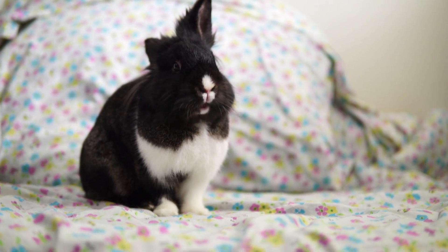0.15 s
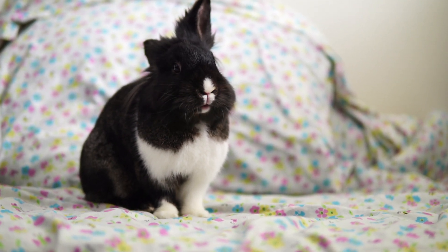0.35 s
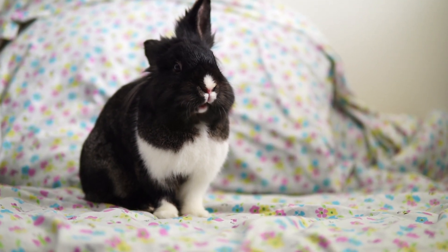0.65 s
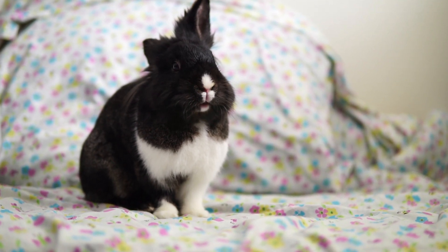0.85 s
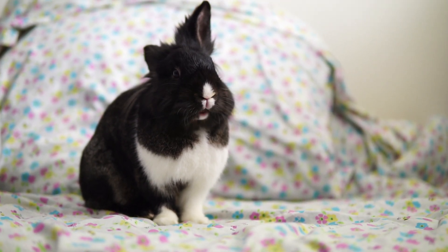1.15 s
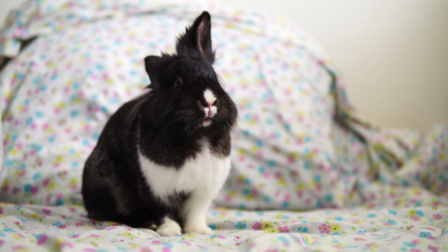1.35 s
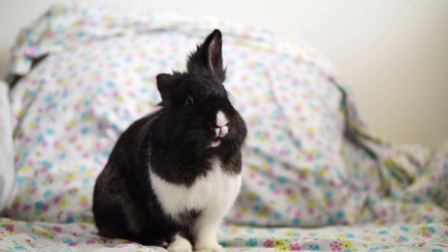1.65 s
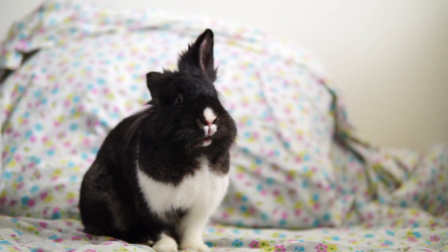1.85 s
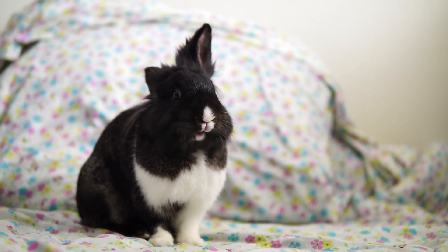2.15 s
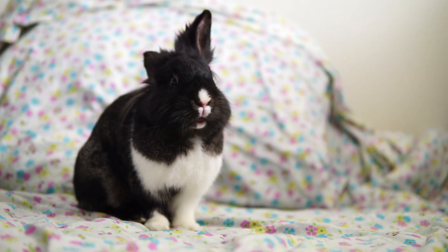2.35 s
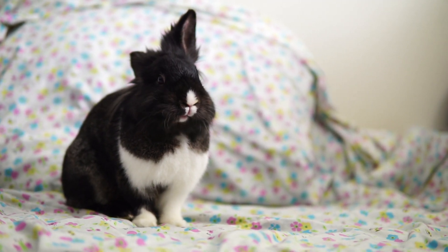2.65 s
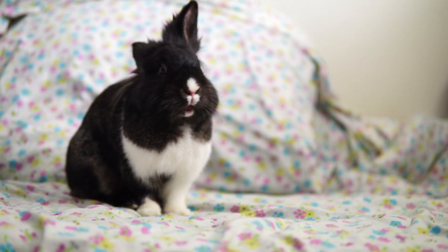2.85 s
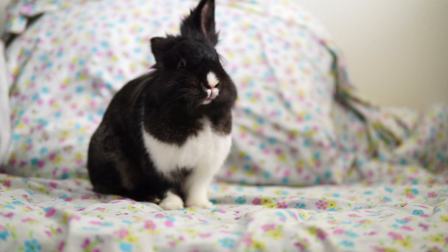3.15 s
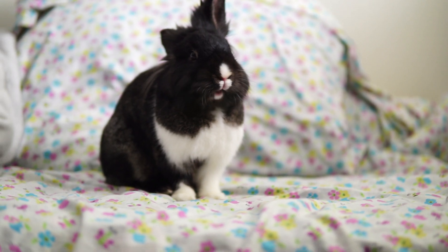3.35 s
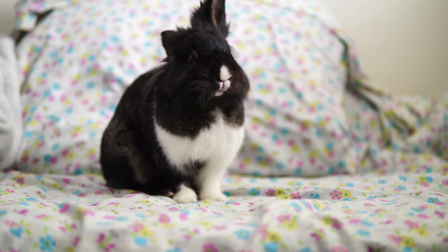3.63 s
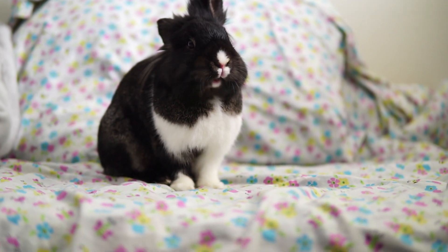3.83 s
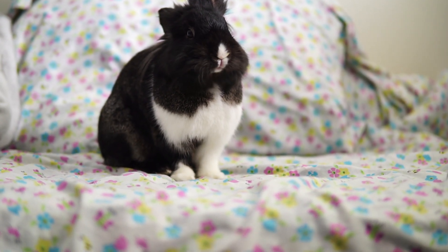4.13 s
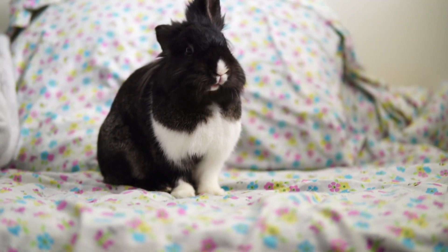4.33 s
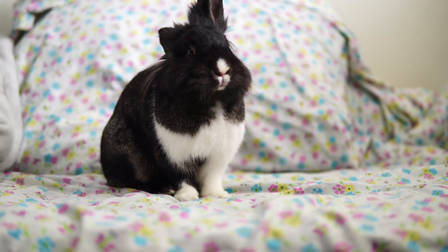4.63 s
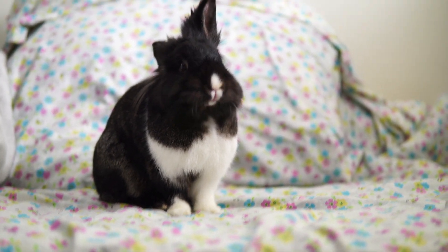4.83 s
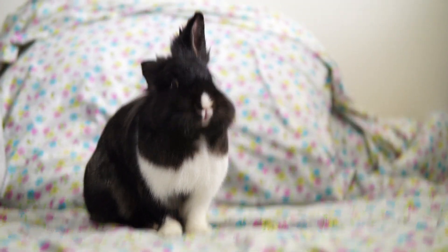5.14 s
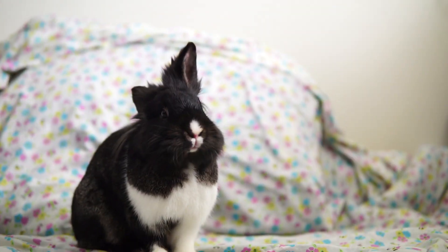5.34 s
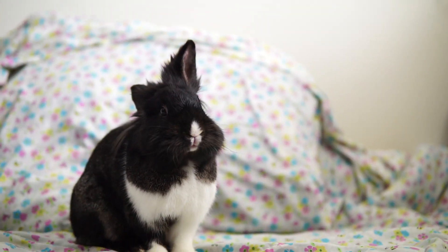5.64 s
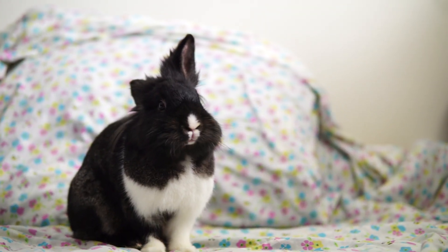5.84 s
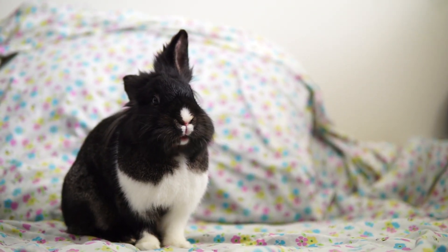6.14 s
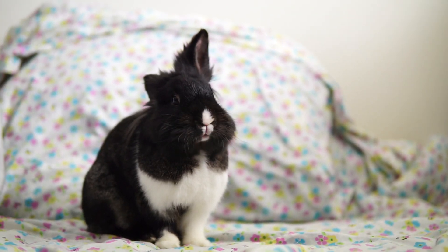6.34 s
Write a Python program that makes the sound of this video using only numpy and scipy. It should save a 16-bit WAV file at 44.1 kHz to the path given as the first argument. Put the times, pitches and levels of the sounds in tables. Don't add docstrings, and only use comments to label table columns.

```python
import sys
import numpy as np
from scipy import signal
from scipy.fft import rfft, irfft, next_fast_len
from scipy.io import wavfile
from scipy.ndimage import map_coordinates

SR = 44100
rng = np.random.default_rng(int(sys.argv[2]) if len(sys.argv) > 2 else 0)


def bounce(signal):
    frames = np.transpose(np.atleast_2d(signal))
    limited = np.clip(frames, -1, 1)
    pcm = np.round(limited * 32767).astype(np.int16)
    wavfile.write(sys.argv[1], SR, pcm)


def to_linear_factor(level_db):
    exponent = np.asarray(level_db, float) / 20
    return 10 ** exponent


N = 286006

# f/Hz, density/(dB per Hz)
FRICTION_COLOUR = [(59, -63), (100, -26), (210, -8), (328, -3.5), (570, -14), (691, -12), (1150, -8.5),
                   (2370, -3), (3190, -2.5), (6150, -15), (7450, -11), (10000, -13), (16000, -11)]


def unit(x):
    return x / np.sqrt(np.mean(x ** 2) + 1e-20)


def along(points, hz):
    f, v = np.transpose(points)
    return np.interp(np.log(hz + 1), np.log(f + 1), v)


def curves(rows):
    s, *cols = np.transpose(rows)
    return [np.interp(np.arange(N) / SR, s, c) for c in cols]


def wobble(rate_hz, size=N):
    knots = rng.standard_normal(int(size * rate_hz / SR) + 4)
    return map_coordinates(knots, [np.arange(size) * rate_hz / SR])


def filtered(x, response):
    m = next_fast_len(x.shape[-1] + 4096)
    spectrum = rfft(x, m) * response(np.fft.rfftfreq(m, 1 / SR))
    return irfft(spectrum, m)[..., :x.shape[-1]]


def modes(table):
    def response(f):
        total = 0
        for k, (c, w, db) in enumerate(table):
            total = total + (-1) ** k * to_linear_factor(db) * 1j * f * w / (c * c - f * f + 1j * f * w)
        return total
    return response


def ports(pair, alike):
    lead_s = 5 / 44100

    def angle(f):
        return np.arccos(np.clip(alike, 0, 1)) / 2 * f / (f + 150)

    mid, side = filtered(pair, lambda f: np.array([np.cos(angle(f)), np.sin(angle(f))]))
    stereo = np.array([mid + side, mid - side])
    return filtered(stereo, lambda f: np.exp(1j * np.pi * f * lead_s * np.array([[1], [-1]])))


def add(out, part, s):
    out[:, round(s * SR):][:, :part.shape[1]] += part


def hiss():
    # f/Hz, density/(dB per Hz)
    hiss_colour = [(18, -64), (30, -34.5), (150, -15), (309, -7), (480, -9), (1300, -3.5), (2900, -11.5),
                   (4600, -9.5), (7350, -13.5), (11000, -10.5), (13500, -11.5), (15800, -12.5)]
    level_db = -61.5
    a, b = filtered(rng.standard_normal((2, N)), lambda f: to_linear_factor(along(hiss_colour, f)))
    murmur = filtered(a - b, lambda f: 1 / (1 + (f / 500) ** 4))
    return to_linear_factor(level_db + 3.0) * unit(np.array([a, b + murmur]))


def drive():
    # t/s, tick level/dB, upper re lower part/dB
    effort = [(0, -73, -3), (.6, -69, -1), (1.15, -61, -5), (1.9, -66, -1), (2.35, -63, 4), (2.9, -65, -5),
              (3.15, -76, 0), (3.7, -66, -3), (4.1, -62, -3), (4.35, -68, -1), (4.7, -59, 4), (5, -61, 0),
              (5.4, -68, 0), (5.62, -61, -4), (5.88, -64, -4), (5.98, -73, -4), (6.2, -61, -5),
              (6.48, -61, -4)]
    # t/s, level/dB
    extra_knock = [(0, -63.5), (1.1, -60.5), (1.8, -69), (2.2, -67), (3, -73), (3.8, -70), (4.2, -64),
                   (4.5, -70), (5.5, -73), (5.95, -70), (6.07, -65), (6.48, -65)]
    # t/s, level/dB
    whine_strength = [(0, -72), (.9, -68), (1.5, -70), (3.5, -70), (4.2, -66.5), (5.1, -66), (6.48, -68)]
    # f/Hz, width/Hz, level/dB
    lower_part = [(1951, 250, 0), (3800, 300, -12)]
    upper_part = [(2232, 210, 0), (4400, 400, -4)]
    knocked_part = [(1350, 104, 0.5), (2400, 104, 1), (3887, 295, 2)]
    round_db = [0, -5.5, -2.5, -3]
    field_hz, whine_hz, chatter_t60_s = 59.94, 12947., 0.026

    (tick_db, upper_db), (knock_db,) = curves(effort), curves(extra_knock)
    k, t = np.arange(int(N / SR * field_hz) - 1), np.arange(N) / SR
    at_s = .0002 + k / field_hz + .0022 * (k % 4 == 3)
    at = np.round(at_s * SR).astype(int)
    blows = np.zeros((2, N))
    blows[0, at] = to_linear_factor(2 * rng.standard_normal(len(k)) + np.array(round_db)[k % 4])
    blows[1, at] = to_linear_factor(1.3 * rng.standard_normal(len(k)) - 14 * np.isin(k % 4, (1, 2)))
    decay = to_linear_factor(-60 * t[None, :SR // 20] / chatter_t60_s)
    chatter = signal.fftconvolve(blows, decay, axes=1)[:, :N]

    def struck(i, parts):
        force = blows[i] + .06 * chatter[i] * rng.standard_normal((2, N))
        return unit(filtered(force, lambda f: modes(parts)(f) ** 2))

    ticks = to_linear_factor(tick_db - 1.5) * (struck(0, lower_part) - to_linear_factor(upper_db) * struck(0, upper_part))
    ticks = ticks + to_linear_factor(knock_db) * struck(1, knocked_part)

    throb = 1 + .75 * np.cos(2 * np.pi * field_hz * (t - .006))
    throb = throb + .3 * np.cos(6 * np.pi * field_hz * (t - .004))
    tone = np.sin(2 * np.pi * whine_hz * t + .7 * wobble(40))
    whine = to_linear_factor(curves(whine_strength)[0]) * unit(throb * to_linear_factor(1.5 * wobble(6)) * tone)
    return ports(ticks, alike=0.32) * to_linear_factor([[1.2], [-1.2]]) + whine * [[1.1], [.9]]


def bumps():
    # t/s, peak level/dB, f/Hz, t60/s
    pushes = [(0.1, -40.5, 183, 0.066), (0.104, -57, 86, 0.088), (2.256, -36.5, 323, 0.1),
              (2.262, -66, 80, 0.054), (3.651, -51, 200, .08), (3.72, -52, 217, 0.12),
              (3.745, -45, 247, 0.11), (4.53, -55, 201, .12), (4.748, -52, 203, 0.12),
              (5.09, -64, 152, 0.17), (5.2, -61, 90, 0.08), (5.255, -54, 153, 0.14),
              (5.33, -60, 110, 0.053), (5.701, -65, 130, 0.12)]
    out, t = np.zeros((2, N + SR)), np.arange(SR // 4) / SR
    for s, db, hz, t60_s in pushes:
        onset = 1 - np.exp(-t / 0.0016)
        swing = to_linear_factor(db - 60 * t / t60_s) * np.sin(2 * np.pi * hz * t) * onset
        add(out, swing * [[1], [1]], s)
    return out[:, :N]


def strokes():
    rubs = [(0.725, 0.27, -61, -19, -5), (1, 1, -57, -35, -1.5), (1.662, 0.31, -59.5, -6, -6),
            (1.98, 0.38, -62, -1, -11), (2.18, .3, -66, 4, -11), (2.28, 0.48, -58, 0.2, -4),
            (2.85, 0.7, -57, -13, -9), (3.51, 0.33, -51.5, -2.5, -7), (3.701, 0.32, -51, -2.5, -2),
            (4.247, 0.29, -66, 3.5, -1), (4.35, 0.48, -62, -1, 1.5), (4.57, 0.51, -49.5, -0.5, -1),
            (4.741, 0.21, -50.5, -2.5, -6), (5.05, .3, -55, -3, -21), (5.231, 0.44, -50, -6, 0.5),
            (5.816, 0.68, -62, -10, -1), (6.284, 0.3, -61.5, -5, 0)]
    rest_db = [-70.5, -66, -82.5, -76]
    air_re_fizz_db, peakedness = -3, 2.35
    t = np.arange(N) / SR
    power = to_linear_factor(2 * np.array(rest_db))[:, None] * np.ones(N)
    for s, length_s, db, weight_db, speed_db in rubs:
        phase = np.pi * np.clip((t - s) / length_s, -.5, .5)
        swell = np.abs(np.cos(phase)) ** (2 * peakedness)
        band_db = db + np.array([weight_db, 0, speed_db, speed_db + air_re_fizz_db])
        power = power + to_linear_factor(2 * band_db)[:, None] * swell
    return np.sqrt(power)


def rubbing():
    # low f/Hz, high f/Hz
    bands = [(180, 900), (900, 5200), (5200, 15800), (9800, 11800)]
    grit_by_band = [1, .65, .15, .1]
    # f/Hz, width/Hz, level/dB
    air_whistle = [(10200, 500, 0), (11400, 500, 0)]
    crumbs_hz, crackle_db, crumb_life_s = 250, -4, .0015

    crumbs = (rng.random(N) < crumbs_hz / SR) * rng.exponential(size=N)
    crackle = signal.lfilter([1], [1, -np.exp(-1 / (crumb_life_s * SR))], crumbs)
    grain = to_linear_factor(1.65 * wobble(300) + 0.79 * wobble(40)) * (1 + to_linear_factor(crackle_db) * crackle)
    out = 0
    for gain, (lo, hi), grit in zip(strokes(), bands, grit_by_band):
        def skirt(f):
            low_side = 1 + (lo / (f + 1)) ** (6 + lo / 400)
            high_side = 1 + (f / hi) ** (10 + lo / 400)
            return to_linear_factor(along(FRICTION_COLOUR, f)) / np.sqrt(low_side * high_side)

        colour = modes(air_whistle) if lo == bands[-1][0] else skirt
        noise = filtered(grain ** grit * rng.standard_normal((2, N)), colour)
        out = out + gain * to_linear_factor(0.72 * wobble(30)) * unit(noise)
    return ports(out, alike=0.066) * to_linear_factor([[-.7], [.7]])


def slides():
    # start/s, end/s, f/Hz, level/dB
    squeaks = [(0.73, 0.78, 11400, -72), (0.73, .968, 14100, -57), (0.983, 1.074, 12700, -60),
               (.95, 1.06, 6900, -55.5), (1.276, 1.297, 843, -44), (1.279, 1.287, 3140, -33.5),
               (2.1, 2.21, 712, -55.5), (2.002, 2.148, 2100, -61), (2.085, 2.28, 409, -58.5),
               (2.303, 2.338, 1135, -54.5), (2.497, 2.527, 1070, -60), (2.001, 2.018, 1370, -45.5),
               (2.003, 2.05, 720, -53), (1.7, 2.4, 11000, -69), (4.2, 4.5, 10800, -64),
               (5.6, 6.4, 11000, -69), (2.779, 2.934, 4160, -59.5), (2.783, 2.91, 1725, -62),
               (3.013, 3.039, 1435, -49), (4.49, 4.61, 705, -54.5), (4.69, 4.79, 1100, -60),
               (5.089, 5.183, 3260, -50), (5.865, 6.0, 408, -60)]
    # start/s, end/s, f/Hz, level/dB, hiss re level/dB
    rasps = [(.083, .099, 1600, -47, 7.5), (.155, .192, 2990, -55, -1.2), (2.669, 2.76, 5500, -62, 0),
             (3.49, 3.545, 2020, -54, 1), (3.505, 3.56, 800, -55, -6), (3.46, 3.49, 2400, -55, 0),
             (4.82, 4.92, 2810, -55, -1.5), (5.033, 5.075, 690, -51.5, -12), (4.97, 5.09, 3100, -52, -3),
             (5.266, 5.326, 4870, -48.5, -5), (6.199, 6.308, 950, -60.5, -12),
             (6.196, 6.295, 7050, -61, 7.5)]
    # start/s, end/s, first f/Hz, last f/Hz, level/dB
    glides = [
        (2.128, 2.255, 1967, 2400, -49),
        (2.268, 2.315, 1590, 1930, -40.5),
        (5.174, 5.209, 2943, 2426, -30),
    ]
    # start/s, end/s, first f/Hz, last f/Hz, level/dB
    streaks = [(4.36, 4.63, 3900, 3800, -56), (4.39, 4.65, 3300, 3150, -53), (4.49, 4.63, 2800, 2650, -55),
               (4.64, 4.73, 3150, 3000, -52), (4.65, 4.79, 2750, 2700, -52), (4.63, 4.74, 3800, 3700, -59),
               (.66, .82, 4800, 4900, -62), (6.19, 6.26, 950, 1200, -64), (5.68, 5.76, 350, 330, -62)]
    # start/s, end/s, f/Hz, level/dB
    tails = [(1.281, 1.305, 1550, -43), (2.004, 2.06, 2050, -52), (2.257, 2.285, 700, -39),
             (2.257, 2.285, 1300, -39), (2.67, 2.78, 4200, -54), (2.67, 2.76, 1900, -55),
             (3.644, 3.7, 4500, -54), (5.253, 5.275, 3300, -34), (5.256, 5.31, 2300, -38.5),
             (5.256, 5.3, 10500, -41), (1.28, 1.33, 600, -46), (3.012, 3.03, 950, -46),
             (2.004, 2.04, 420, -52)]
    sag = .98
    wide, fine = .18, .05
    squeak_hiss_db, tail_fade_db = -14, 14
    quick_hiss_db, calm_db, quick_s = -3, 9.5, 0.041

    out = [(a, b, hz, sag * hz, db, squeak_hiss_db, wide, 0) for a, b, hz, db in squeaks]
    out += [(a, b, hz, sag * hz, db, hiss_db, wide, 0) for a, b, hz, db, hiss_db in rasps]
    for a, b, hz, last_hz, db in glides:
        hiss_db = quick_hiss_db - calm_db * np.log2((b - a) / quick_s)
        out.append((a, b, hz, last_hz, db, hiss_db, wide, 0))
    out += [(a, b, hz, last_hz, db, squeak_hiss_db, fine, 0) for a, b, hz, last_hz, db in streaks]
    out += [(a, b, hz, sag * hz, db, squeak_hiss_db, wide, tail_fade_db) for a, b, hz, db in tails]
    return out


def scrapes():
    out = np.zeros((2, N + SR))
    for start, end, first_hz, last_hz, db, hiss_db, width, fade_db in slides():
        u = np.linspace(0, 1, round((end - start) * SR))
        phase = 2 * np.pi * np.cumsum(first_hz + (last_hz - first_hz) * u) / SR

        def sway():
            return wobble(first_hz * (width + first_hz / 45000), size=len(u))

        band = np.array([sway() * np.cos(phase) + sway() * np.sin(phase) for _ in range(2)])
        broad = filtered(rng.standard_normal(band.shape),
                         lambda f: to_linear_factor(along(FRICTION_COLOUR, f)) * (f > 900))
        if fade_db:
            shape = np.sqrt((1 - u) * np.minimum(1, 15 * u)) * to_linear_factor(-fade_db * u)
        else:
            shape = np.abs(np.sin(np.pi * u)) ** .55
        swell = shape * to_linear_factor(3 * wobble(140, size=len(u)))
        friction = (unit(band) + to_linear_factor(hiss_db) * unit(broad)) * swell
        add(out, to_linear_factor(db) * ports(friction, alike=0.12), start)
    return out[:, :N]


def contacts():
    # t/s, peak level/dB, ring f/Hz, fizz re peak/dB
    smacks = [(1.637, -42.5, 2020, -21), (1.663, -42, 440, -9), (1.688, -39, 430, -11),
              (1.898, -38, 445, -10.5), (1.919, -40.5, 423, -7), (1.949, -45.5, 422, -19),
              (3.425, -58, 630, 8), (4.745, -40, 432, -11), (5.859, -37.5, 450, -25)]
    knocks = [(0.174, -45, 2100, -8), (0.369, -61, 1350, -5), (1.3065, -32, 1000, -43),
              (2.003, -30, 700, -47), (2.106, -40.5, 700, -21), (2.223, -36, 720, -30),
              (2.238, -23, 2300, -22.5), (2.269, -21.5, 1320, -13.5), (3.237, -45, 680, -40),
              (3.4602, -28.5, 2110, -6), (3.495, -34, 2100, -11), (3.5135, -33, 2100, -10),
              (3.525, -31.5, 967, -14), (4.179, -42, 402, 2), (4.455, -45, 1600, -15),
              (4.829, -35.5, 2400, -36), (4.975, -39.5, 2500, -4.5), (5.219, -30, 1100, -7),
              (5.272, -33, 386, -10), (6.203, -41, 1110, -4.5)]
    cracks = [(0.099, -16.5, 1500, -6), (0.19, -42, 1460, -3), (0.202, -43, 1910, -14),
              (0.934, -48, 2610, -8), (1.141, -28, 1660, -0.5), (1.217, -41, 1960, 0.5),
              (2.256, -15.5, 3300, -20), (2.697, -42, 1900, -20), (2.809, -39, 1800, -20),
              (2.829, -36, 1700, -18), (2.845, -39, 1700, -25), (3.069, -56, 2470, -14),
              (3.446, -38.5, 760, 0.5), (3.7085, -35, 2500, -6), (3.731, -34.5, 616, 1.1),
              (5.178, -28, 2750, -14), (5.252, -8, 2250, -6.5), (5.294, -31, 2600, -15),
              (5.286, -36, 2300, -20), (5.313, -35, 2600, -20), (5.326, -41, 2400, -20),
              (5.35, -40, 2700, -5), (5.38, -34.5, 2770, 0), (5.396, -44, 2770, 2), (5.72, -40.5, 1160, 0),
              (5.736, -35, 2560, 3)]
    snaps = [(0.788, -41, 1890, -18), (2.31, -35, 1140, -27), (2.497, -33.5, 1130, -28),
             (2.668, -19.5, 1830, -21.5), (3.0114, -11.5, 1860, -6), (4.683, -38, 2710, -25),
             (4.7454, -37, 2800, -20), (4.858, -43, 2200, -25), (5.649, -31.5, 2600, -21)]
    ticks = [(1.279, -19, 1480, -24), (1.289, -42, 1500, 0), (2.003, -24, 2040, -20),
             (2.95, -42, 1300, -20), (2.966, -44, 1300, -20), (2.788, -36, 1710, -22),
             (3.642, -14, 2480, -5), (3.671, -29.5, 2100, -7), (3.887, -41, 1950, -2),
             (4.027, -33, 626, -13), (4.815, -27.5, 2550, -22), (5.198, -17, 2400, -12),
             (5.2053, -8.5, 2730, -3), (5.674, -32.5, 1940, -14), (5.777, -39.5, 2200, -4)]
    # thump re peak/dB, bite re peak/dB, bite per fizz/(dB per dB)
    kinds = [
        (-6, -15, 0.5),
        (-13.5, -6.5, 0.6),
        (-27.5, -8.5, -0.15),
        (-39, -11.5, -0.26),
        (-30.5, -12, 1.3),
    ]
    out = []
    for rows, (thump_db, bite_db, follows) in zip((smacks, knocks, cracks, snaps, ticks), kinds):
        for s, db, hz, fizz_db in rows:
            out.append((s, db, hz, thump_db, bite_db + follows * fizz_db, fizz_db))
    return sorted(out)


def clicks():
    # f/Hz, width/Hz, level/dB
    shell = [(2870, 520, -4), (3930, 1210, 2.5), (4800, 1080, 0), (5700, 300, -12.5)]
    thump_modes = [(280, 160, -3), (430, 200, 0), (800, 330, -2)]
    fizz_modes = [(6580, 2500, 0), (11860, 3000, 1), (14900, 1120, 0)]
    out, t = np.zeros((2, N + SR)), np.arange(SR // 12) / SR

    def peak(v):
        return v / np.abs(v).max()

    def fall(t60_s, tail):
        return to_linear_factor(-60 * t / t60_s) + tail * to_linear_factor(-60 * t / 0.18)

    for s, db, hz, thump_db, bite_db, fizz_db in contacts():
        slips = rng.standard_normal((4, 2, len(t))) * (1 - np.exp(-t / 0.00016))
        slips[:, 0, 4] += 4
        ring_modes = [(hz, 0.18 * hz, 0), (1.89 * hz, 0.63 * hz, -6), (2.114 * hz, 0.32 * hz, -5)]
        ring = filtered(slips[0] * fall(0.019, 0.049), modes(ring_modes))
        thump = filtered(slips[1] * fall(.004, .015), modes(thump_modes))
        thump = filtered(thump, modes([(427, 550, 0)]))
        bite = filtered(slips[2] * fall(0.014, 0.032), modes(shell))
        fizz = filtered(slips[3] * fall(0.0095, 0.0044), modes(fizz_modes))

        ring_power = 1 - to_linear_factor(2 * thump_db) - to_linear_factor(2 * bite_db) - to_linear_factor(2 * fizz_db)
        ring_gain = np.sqrt(np.clip(ring_power, .05, 1))
        dull = ring_gain * peak(ring) + to_linear_factor(thump_db + 7.5) * peak(thump)
        sharp = to_linear_factor(bite_db + 8.5) * peak(bite) + to_linear_factor(fizz_db + 9.5) * peak(fizz)
        both = ports(dull, alike=0.3) * to_linear_factor([[.8], [-.8]])
        both = both + ports(sharp, alike=0.11) * to_linear_factor([[-1.8], [1.8]])
        radiated = filtered(both, lambda f: (1j * f / (1j * f + 160)) ** 3)
        add(out, to_linear_factor(db - 2.0) * radiated, s)
    return out[:, :N]


def scene():
    steady = hiss() + drive() + rubbing() + scrapes()
    return bumps() + filtered(steady, lambda f: f < 15800) + clicks()


def low_pass(x):
    return signal.sosfilt(signal.butter(12, 16970, fs=SR, output="sos"), x)


def record(dry):
    mix = filtered(dry, lambda f: 1 / (1 + (f / 16800) ** 60))
    return low_pass(mix)


dry = scene()
out = record(dry)
bounce(out)
```